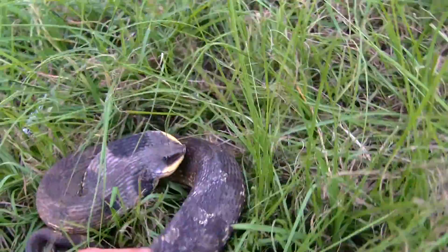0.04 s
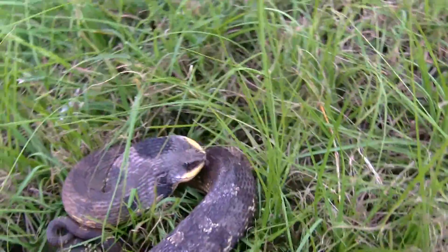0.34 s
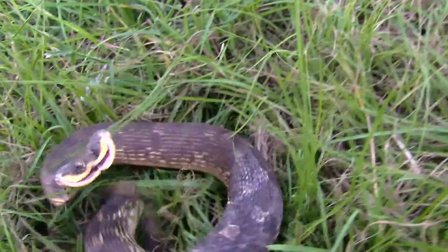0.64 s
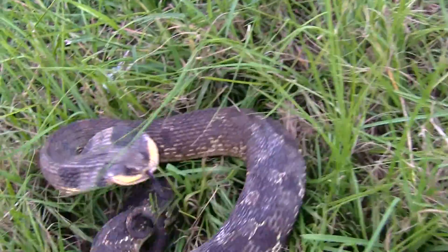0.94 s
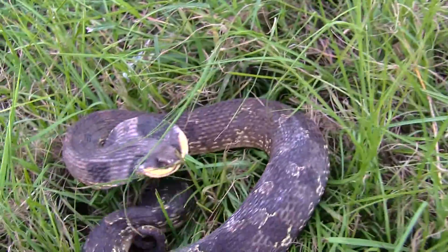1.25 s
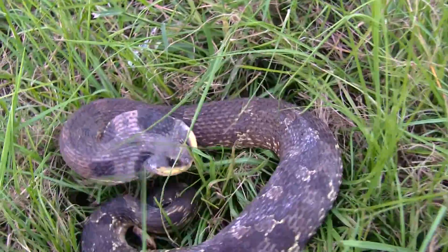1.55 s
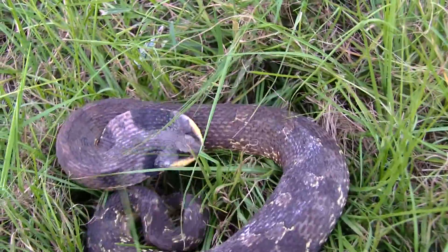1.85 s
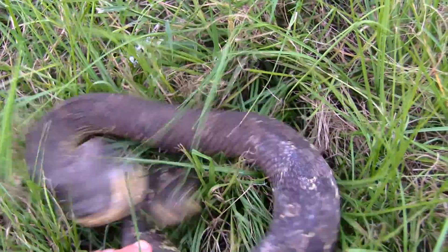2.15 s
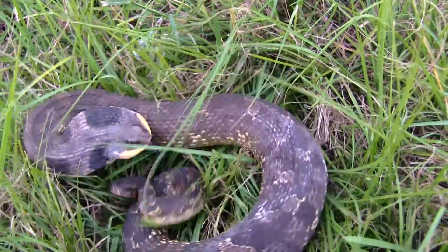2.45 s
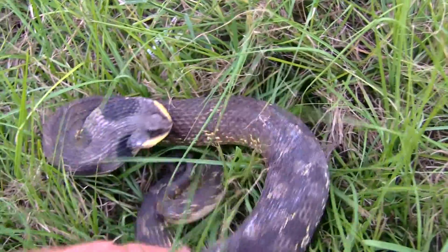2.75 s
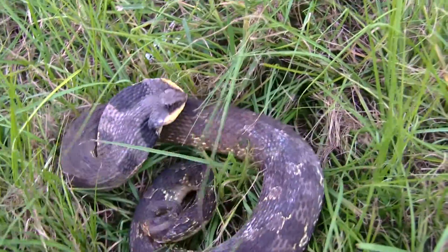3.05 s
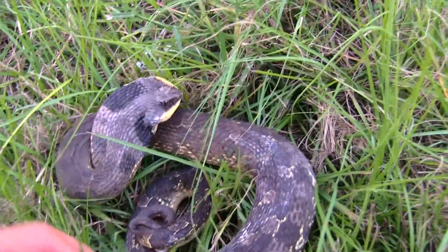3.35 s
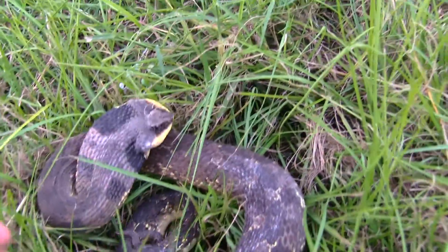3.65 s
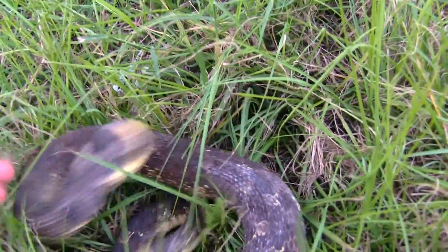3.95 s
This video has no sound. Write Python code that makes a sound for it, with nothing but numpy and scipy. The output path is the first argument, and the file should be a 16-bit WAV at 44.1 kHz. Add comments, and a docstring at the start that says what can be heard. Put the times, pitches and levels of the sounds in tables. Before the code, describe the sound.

A snake hisses close by, softly for the first half second. A rush through grass with dull scuffs and bumps peaks around 0.5 seconds, followed by tiny snapping blades. One short puff comes at 1.4 seconds. Around 2.2 seconds it lunges again, then a long, hard hiss swells and holds until 4 seconds, its tone sinking slightly. Faint outdoor air and a low hum lie underneath.

```python
"""Snake lunging on a lawn

Close up, a soft hiss gives way to a rush through the grass, with dull bumps, snapping blades and one
short puff. The snake lunges again and lets out a long, hard hiss: a jet of air whose resonances slide
as the airway changes shape. A faint low hum lies under the outdoor air."""
import sys
import numpy as np
from scipy import signal
from scipy.fft import rfft, irfft
from scipy.io import wavfile

SR = 44100
rng = np.random.default_rng(int(sys.argv[2]) if len(sys.argv) > 2 else 0)


def generate_wav(sig):
    """Save sig (samples, or channels by samples) to the path in sys.argv[1] as 16-bit PCM at SR."""
    pcm = np.round(np.clip(np.atleast_2d(sig).T, -1, 1) * 32767).astype(np.int16)
    wavfile.write(sys.argv[1], SR, pcm)


N = 176400

HISS_SIDE_DB, GRASS_SIDE_DB = -16.5, -6   # stereo width: side relative to mid
# bright tone of brushed grass: f/Hz, level/dB
GRASS_COLOUR = [(400, -9), (1200, 4), (2200, -1.5), (4500, 3), (9500, 3), (15600, -3)]


def from_db(db):
    """Decibels to gain."""
    return 10 ** (np.asarray(db) / 20)


def unit_rms(x):
    """Scale to unit level."""
    return x / np.sqrt(np.mean(x ** 2) + 1e-20)


def since(start):
    """Seconds since a moment, zero before it."""
    return np.maximum(np.arange(N) / SR - start, 0)


def automation(rows):
    """One sample-by-sample curve for each column after the time."""
    times, *columns = np.transpose(rows)
    return [np.interp(since(0), times, column) for column in columns]


def eq_curve(points):
    """Points of f/Hz, level/dB as a gain for each frequency bin."""
    hz, db = np.transpose(points)
    bin_hz = np.arange(N // 2 + 1) * SR / N
    return from_db(np.interp(np.log(bin_hz + 1), np.log(hz), db))


def drift(rate_hz):
    """Smooth random wandering of spread 1."""
    bin_hz = np.arange(N // 2 + 1) * SR / N
    return unit_rms(irfft(rfft(rng.standard_normal(N)) / (1 + (bin_hz / rate_hz) ** 2), N))


def stereo(pair, side_db):
    """Two unrelated signals as mid and side, at unit level."""
    return unit_rms(pair[0] + from_db(side_db) * pair[1] * np.array([[1], [-1]]))


def noise(colour, side_db):
    """Coloured stereo noise of unit level."""
    return stereo(irfft(rfft(rng.standard_normal((2, N))) * eq_curve(colour), N), side_db)


def resonance(hz, width_hz, side_db):
    """Turbulence ringing in a band of roughly this width, around a centre that can move."""
    pole = np.exp(-1.5 * np.pi * width_hz / SR)
    a, b = signal.lfilter([1], [1, -2 * pole, pole * pole], rng.standard_normal((2, 2, N)))
    phase = 2 * np.pi * np.cumsum(hz) / SR
    return stereo(a * np.cos(phase) + b * np.sin(phase), side_db)


def outdoor_air():
    """A quiet, dark bed of air, nearly mono in the bass and wider above."""
    # tone of the air: f/Hz, level/dB
    colour = [(20, -16), (60, -7), (135, -1.5), (170, -7), (280, -9.5), (480, -16.5), (1450, -20),
              (4200, -28), (15500, -42.5)]
    # its side relative to its mid: f/Hz, level/dB
    width = [(60, -20), (150, -13.5), (400, -5.5), (1500, -5.5), (12000, -8)]
    mid, side = rfft(rng.standard_normal((2, N))) * eq_curve(colour)
    spectrum = mid + side * eq_curve(width) * np.array([[1], [-1]])
    return from_db(-46) * unit_rms(irfft(spectrum, N))


def distant_hum():
    """Two low tones that waver in phase and level."""
    # tones of the hum: f/Hz, level/dB
    tones = [(87, -57.5), (120, -54.5)]
    out = 0
    for hz, db in tones:
        tone = np.sin(2 * np.pi * hz * since(0) + 0.54 * drift(3.4))
        out += from_db(db) * unit_rms(tone * from_db(-0.5 * drift(3.9)))
    return out


def soft_hiss():
    """Gentle flow through the airway: the opening hiss, then a faint draw of air."""
    # air flow of the hiss: t/s, level/dB
    flow = [(0, -43.5), (.11, -42), (.19, -37.5), (.38, -41.5), (.46, -51), (.58, -80)]
    # air drawn between the hisses: t/s, level/dB
    draw = [(1.2, -87), (1.5, -56), (1.85, -66), (2.0, -72)]
    # tone of both: f/Hz, level/dB
    colour = [(250, 0), (600, -6.5), (1100, -5.5), (1650, -11.5), (2000, -2), (2500, -7.5), (2800, -5),
              (3200, -11), (3650, -4), (4300, -10.5), (4620, -2), (5700, -5), (6900, 0), (8200, -0.5),
              (8550, -7), (9700, -14), (15500, -20)]
    envelope = from_db(automation(flow)[0]) + from_db(automation(draw)[0])
    return envelope * noise(colour, HISS_SIDE_DB)


def grass_swish():
    """The body sweeps through the grass in two grainy rushes."""
    # swell of the lunges: t/s, level/dB
    swell = [(.1, -66), (.28, -46.5), (.4, -37.5), (.5, -34.5), (.55, -34.5), (.585, -46), (.65, -49),
             (.69, -45), (.86, -56), (2.05, -58), (2.2, -42.5), (2.4, -41), (2.6, -56)]
    grass = noise(GRASS_COLOUR, GRASS_SIDE_DB)
    grain = from_db(1.5 * drift(rate_hz=220))
    return from_db(automation(swell)[0]) * unit_rms(grass * grain)


def ground_scuffs():
    """Each lunge rubs the ground with a dull, rough scuff."""
    # per scuff: width/Hz, then a path of t/s, level/dB, f/Hz
    scuffs = [ (705, [(.31, -59, 301.5), (.335, -41, 355), (.365, -44, 543), (.38, -39, 554),
              (.43, -42, 552.6), (.55, -36, 641.7), (.58, -48.5, 500.8), (.72, -48, 401.7),
              (.9, -68, 353)]), (222, [(1.9, -73, 330.8), (2.1, -51.5, 350), (2.2, -43, 533.3),
              (2.27, -47.5, 515.3), (2.7, -64, 506.6)])]
    dull_band = signal.butter(2, [130, 1300], "band", fs=SR, output="sos")
    out = 0
    for width_hz, path in scuffs:
        db, hz = automation(path)
        rub = resonance(hz, width_hz, side_db=-9.5) * from_db(drift(rate_hz=62))
        out += from_db(db) * unit_rms(signal.sosfilt(dull_band, rub))
    return out


def bumps(rise_s=0.0023):
    """Soft contacts, each ringing briefly at one pitch."""
    # contacts: t/s, peak level/dB, f/Hz, t60/s
    contacts = [(.328, -35, 163, 0.087), (.343, -31, 794, 0.018), (.378, -35.5, 168, 0.14),
                (.439, -33, 620, 0.019), (0.6196, -21.5, 398, 0.011), (0.758, -28, 478, 0.013),
                (2.221, -33, 1280, 0.0062), (2.326, -32.5, 687, 0.049)]
    out = np.zeros(N)
    for start, db, hz, t60 in contacts:
        attack = np.minimum(since(start) / rise_s, 1)
        decay = from_db(db - 60 * since(start + rise_s) / t60)
        out -= attack * decay * np.sin(2 * np.pi * hz * since(start))
    return out


def blade_snaps(t60_s=0.028, ticks_per_s=30):
    """Tiny cracks of grass blades, among fainter random ticks of settling stems."""
    # snapping blades: t/s, relative level/dB
    snaps = [(.488, -21.5), (0.677, -24), (.868, -35), (1.074, -34), (1.459, -25), (1.501, -31), (2.0, -37)]
    cracks = sum(from_db(db - 60 * since(start) / t60_s) * (since(start) > 0) for start, db in snaps)
    triggers = (rng.random(N) < ticks_per_s / SR) * rng.random(N) * from_db(-44.5)
    ticks = signal.lfilter([1], [1, -from_db(-60 / (t60_s * SR))], triggers + 1e-18)
    return from_db(-12.5) * (cracks + ticks) * noise(GRASS_COLOUR, GRASS_SIDE_DB)


def puff(start_s=1.385, rise_s=.04, hold_s=.02, burst_t60_s=.13, tail_t60_s=.58, tail_hz=1308):
    """One quick, broad burst of air; a duller tail lingers."""
    # tone of the burst: f/Hz, level/dB
    colour = [(100, -14), (190, 4), (600, -5), (2300, -8), (8000, -8), (15500, -16)]
    attack = np.minimum(since(start_s) / rise_s, 1) ** 2
    release_s = since(start_s + rise_s + hold_s)
    burst = from_db(-38.5 - 60 * release_s / burst_t60_s) * noise(colour, GRASS_SIDE_DB)
    tail = resonance(np.full(N, tail_hz), width_hz=tail_hz, side_db=GRASS_SIDE_DB)
    tail *= from_db(-51 - 60 * release_s / tail_t60_s)
    return attack * (burst + tail)


def sliding_notches(hiss, half_width_hz=221):
    """Hollow notches colour the hiss: most sink together, a few slide on their own."""
    # notches that sink together: base f/Hz, depth/dB
    sinking = [(890, 5.5), (2470, 3.5), (6300, 1.5), (9400, 2), (10450, 4.5), (11500, 6.5), (12350, 8)]
    # their fall as the hiss goes on: t/s, frequency ratio
    fall = [(2.6, 1.05), (3.0, 1.014), (3.2, 1.0), (4, .975)]
    # per free notch: half-width/Hz, then a path of t/s, f/Hz, depth/dB
    sliding = [ (431, [(2.33, 3200, 5), (2.53, 4550, 9), (2.8, 4450, 3.5), (3.6, 4170, 4)]),
               (220, [(2.7, 5530, -2), (2.9, 5500, 5), (3.2, 5080, 8), (3.7, 5030, 4)]),
               (520, [(2.94, 7800, 5), (3.03, 7640, 8), (3.11, 7460, 3)])]
    hz, times, frames = signal.stft(hiss, SR, nperseg=1024, noverlap=768)
    hz = hz[:, None]
    at_frames = np.minimum((times * SR).astype(int), N - 1)
    ratio = automation(fall)[0][at_frames]
    cut_db = sum(db * np.exp(-((hz - centre * ratio) / half_width_hz) ** 2) for centre, db in sinking)
    for spread_hz, path in sliding:
        centre, db = automation(path)
        cut_db += db[at_frames] * np.exp(-((hz - centre[at_frames]) / spread_hz) ** 2)
    return signal.istft(frames * from_db(-cut_db), SR, nperseg=1024, noverlap=768)[1][:, :N]


def long_hiss():
    """A hard jet of air excites the airway's sliding resonances; turbulence shakes the flow."""
    # faders of the jet: t/s, flow level/dB, treble level/dB, mids level/dB
    faders = [(2.22, -75, -85, -71), (2.3, -40.5, -59, -49), (2.37, -36, -57, -44), (2.46, -34.5, -45, -41),
              (2.6, -31.5, -41, -43.5), (2.79, -32, -38.5, -40.5), (2.87, -30.5, -40.5, -38),
              (2.98, -29, -33.5, -39.5), (3.35, -29.5, -34.5, -36), (3.48, -30.5, -35.5, -38),
              (3.82, -29.5, -37, -36), (4, -28, -37.5, -33.5)]
    # tone of its core, treble and mids: f/Hz, level/dB
    core = [(3600, -22), (4400, -5.5), (5500, -2), (8100, 0.5), (8900, -3.5), (9900, -24)]
    treble = [(8600, -33), (9400, 2), (10400, 1), (11400, 3.5), (13200, -2), (15600, -11)]
    mids = [(200, -13), (400, -3), (560, 3.5), (700, -7), (1500, 2.5), (3400, 0), (3900, 2.5), (4800, -16)]
    # per airway resonance: width/Hz, then a path of t/s, f/Hz, level/dB relative to the flow
    airway = [ (310, [(2.33, 1960, -17.5), (2.65, 2020, -10.5), (2.95, 2030, -10.5), (3.35, 1880, -17.5),
              (3.56, 1480, -14.5), (3.85, 1435, -12), (4, 1429, -23)]), (754, [(3.42, 2950, -20.5),
              (3.57, 2934, -7), (3.88, 2960, -7.5), (4, 2970, -25)]), (480, [(2.31, 4850, -8),
              (2.38, 5100, -1.5), (2.5, 5310, -16), (2.88, 5200, -7.5), (3.05, 4850, -14),
              (3.3, 4600, -23)]), (320, [(2.72, 6260, -11.5), (2.86, 6200, -5.5), (3.05, 6000, -6.5),
              (3.3, 5840, -7), (4, 5830, -23)]), (346, [(2.35, 7350, -3), (2.55, 7150, -4),
              (2.78, 7360, -20), (2.93, 6980, -1), (3.1, 6750, -9), (3.55, 6810, -11.5),
              (3.98, 6860, -2.5)]), (456, [(2.7, 7925, -9), (2.88, 7600, 3), (3.01, 7950, -22),
              (3.14, 7750, -2.5), (3.65, 7640, 0), (4, 7680, -8.5)]), (340, [(2.45, 3700, -20),
              (2.65, 3800, -15.5), (3.1, 3700, -21.5)]), (600, [(2.68, 12500, -25), (2.85, 12400, -2),
              (3.1, 12400, -30)]), (500, [(2.72, 13300, -32), (2.9, 13300, -9), (3.25, 13050, -23)])]
    flow_db, treble_db, mids_db = automation(faders)
    jet = from_db(flow_db - 1.28) * noise(core, HISS_SIDE_DB)
    jet += from_db(treble_db + 0.4) * noise(treble, side_db=-10)
    jet += from_db(mids_db - 0.5) * noise(mids, HISS_SIDE_DB)
    for width_hz, path in airway:
        hz, share_db = automation(path)
        jet += from_db(flow_db + share_db) * resonance(hz, width_hz, HISS_SIDE_DB)
    flutter = from_db(0.61 * drift(rate_hz=59))
    return sliding_notches(jet) * flutter


def scene(left_db=0.96):
    """The snake over the outdoor bed, all leaning a little to the left."""
    breath = soft_hiss() + long_hiss() + puff()
    movement = grass_swish() + ground_scuffs() + blade_snaps() + bumps()
    bed = outdoor_air() + distant_hum()
    return (breath + movement + bed) * from_db([[left_db / 2], [-left_db / 2]])


def record(dry, cutoff_hz=15680):
    """A steep low-pass takes off the very top."""
    return signal.sosfilt(signal.ellip(16, .2, 80, cutoff_hz, fs=SR, output="sos"), dry)


dry = scene()
out = record(dry)
generate_wav(out)
```